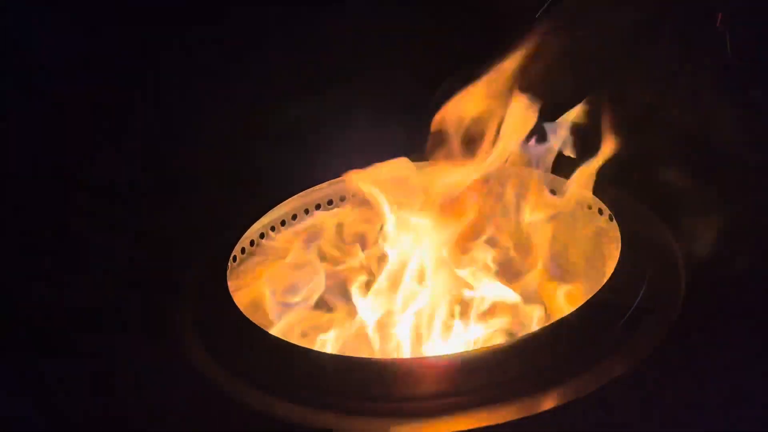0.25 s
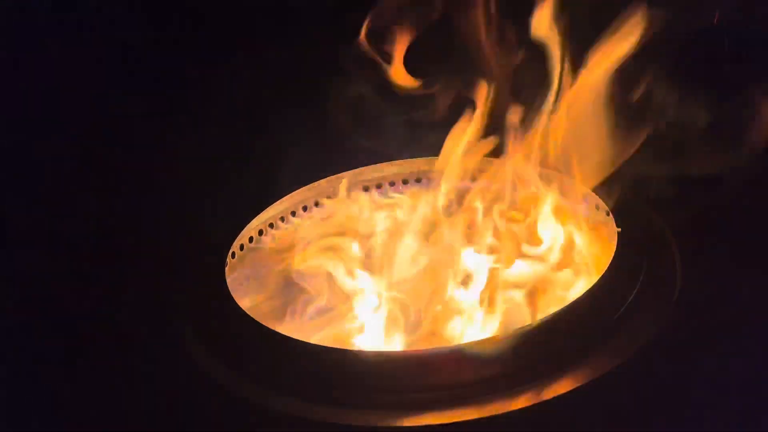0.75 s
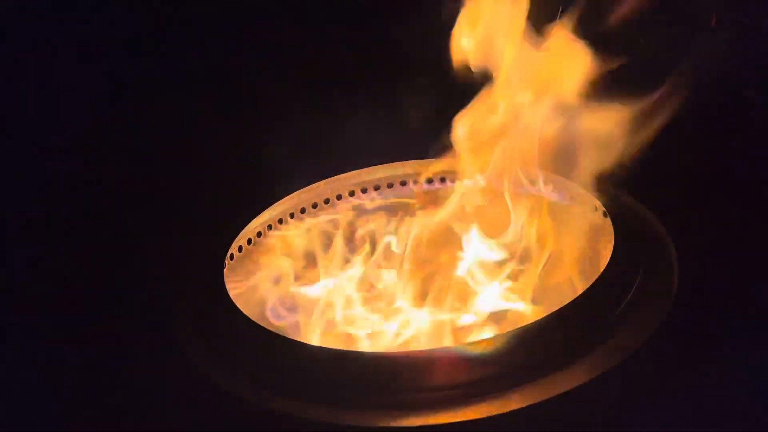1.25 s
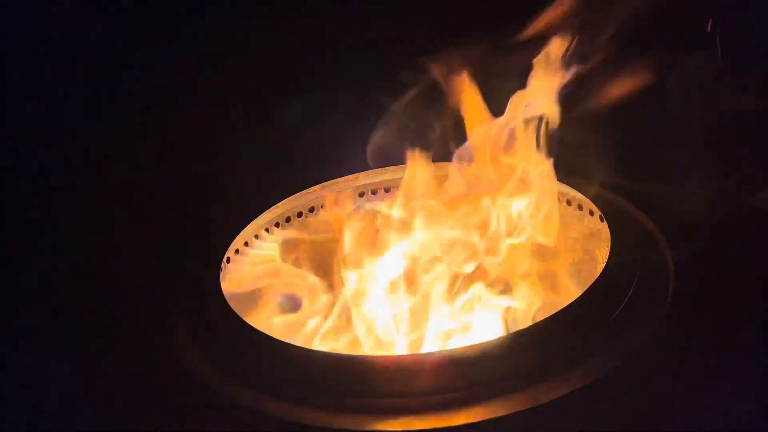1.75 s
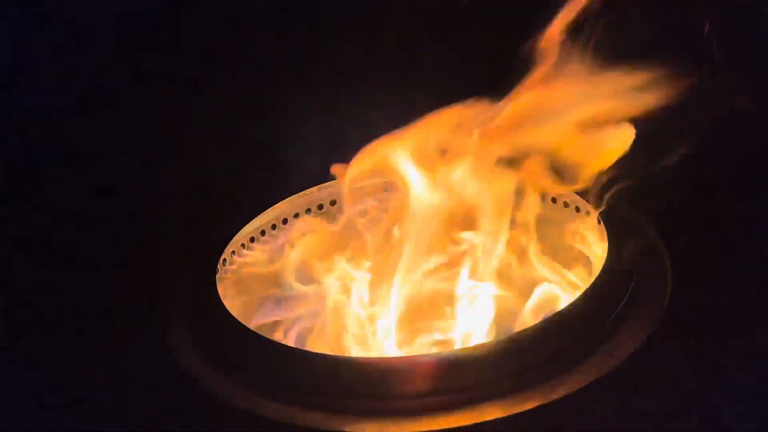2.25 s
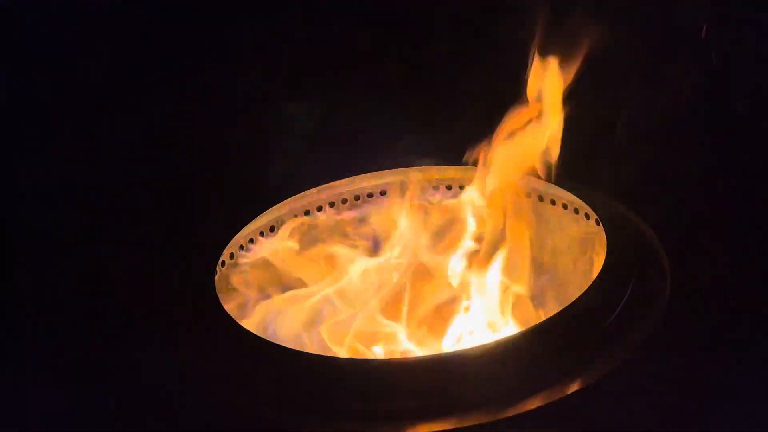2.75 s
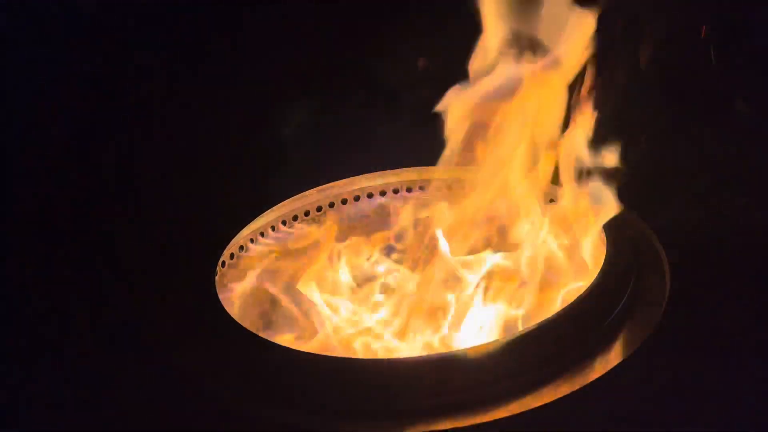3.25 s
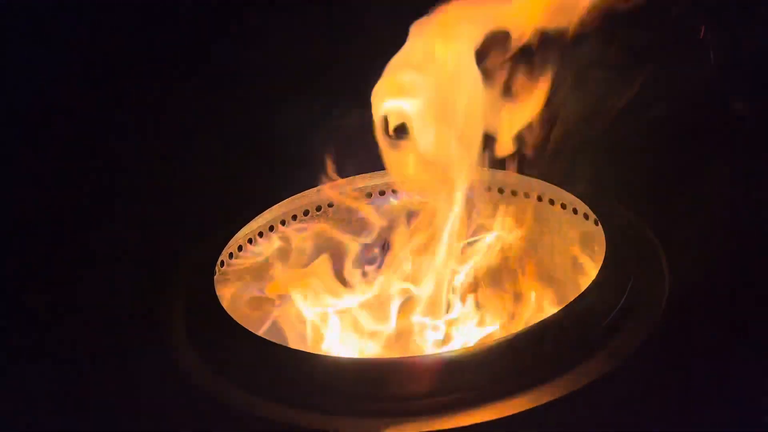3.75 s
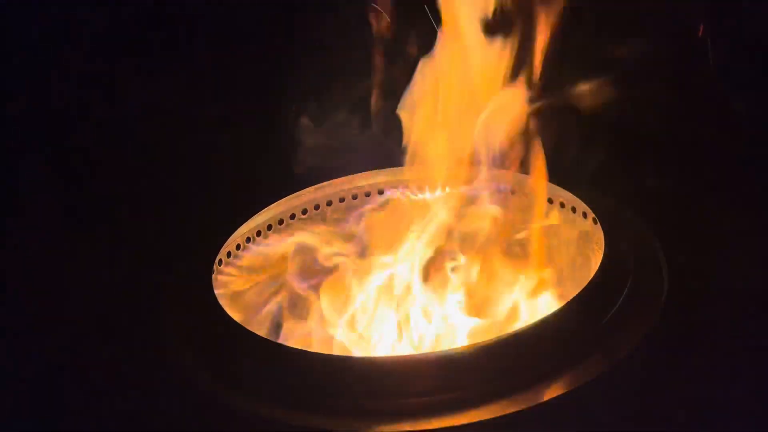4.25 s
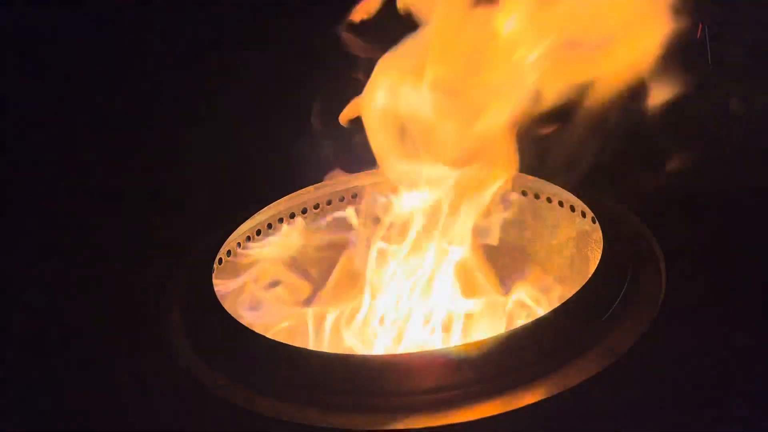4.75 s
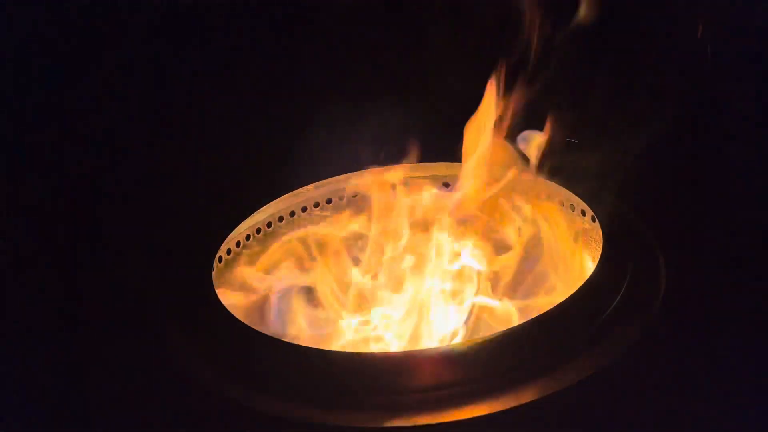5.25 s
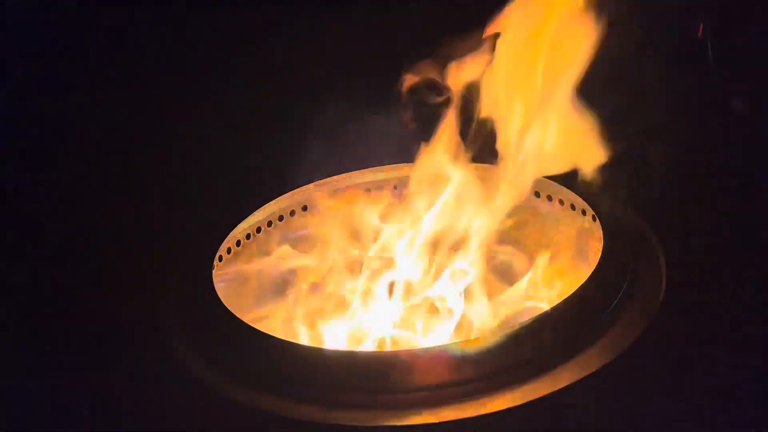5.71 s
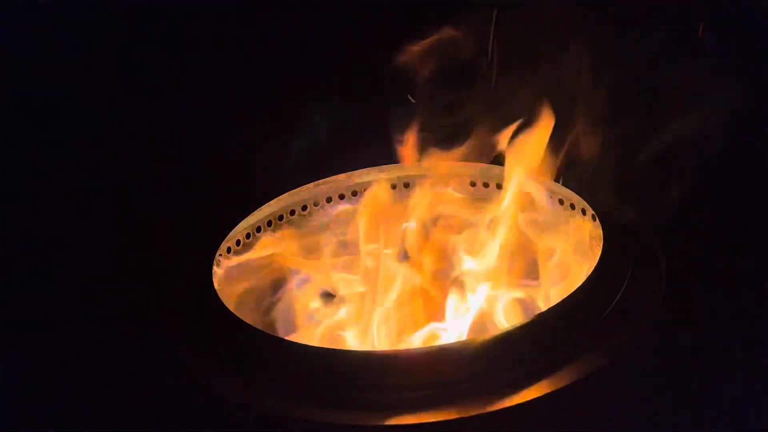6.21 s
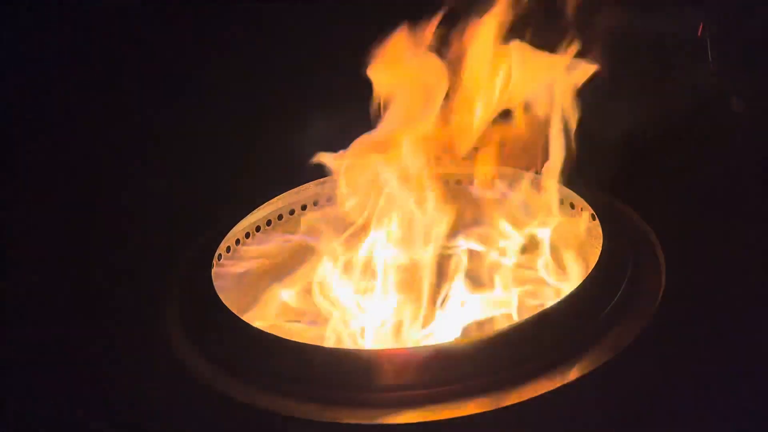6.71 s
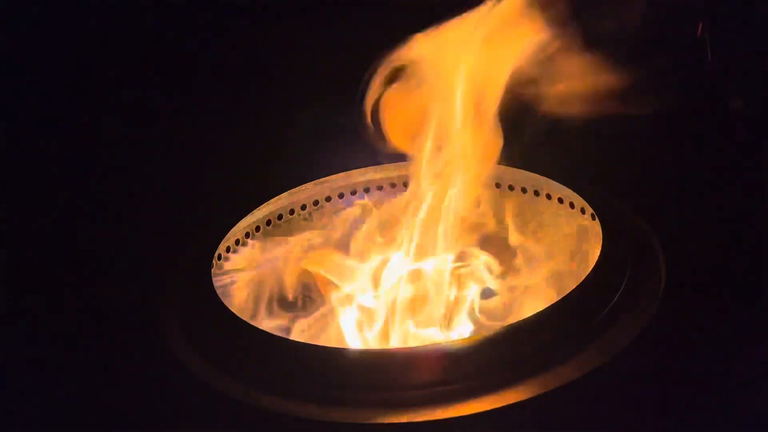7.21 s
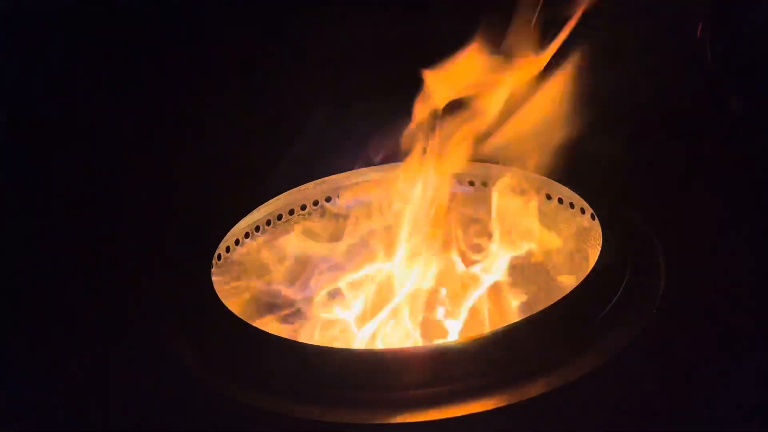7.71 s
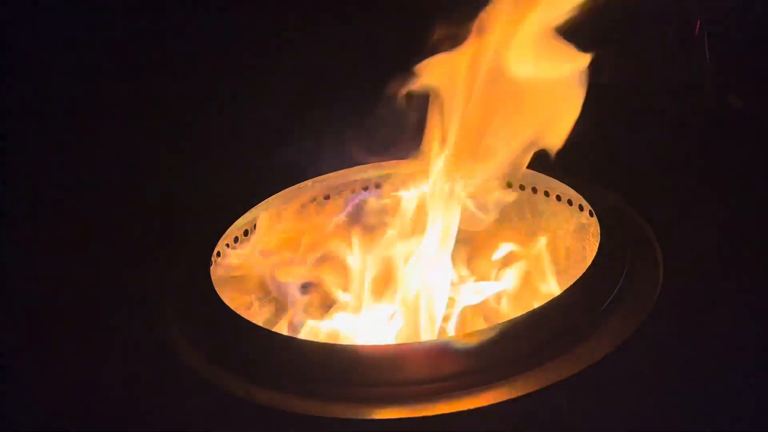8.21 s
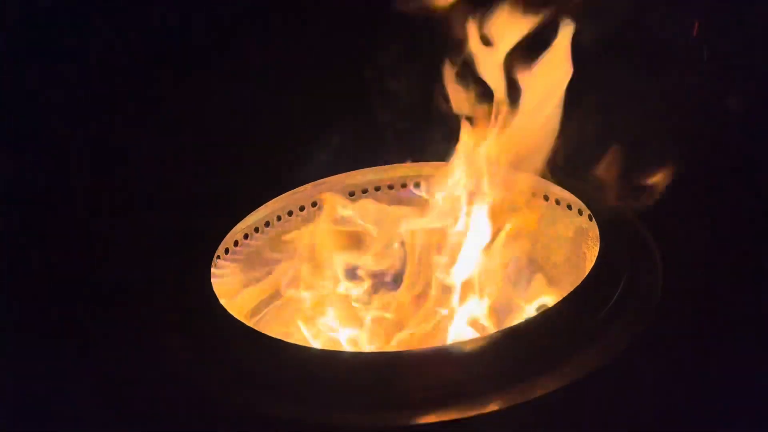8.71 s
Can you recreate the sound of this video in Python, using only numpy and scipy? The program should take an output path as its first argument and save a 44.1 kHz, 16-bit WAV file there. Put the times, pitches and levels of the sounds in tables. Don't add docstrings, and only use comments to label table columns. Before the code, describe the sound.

Outdoors at night, close to a wood fire in a steel pit: a low, lumpy rumble flutters and puffs under an unbroken high cricket trill. Sharp tiny snaps scatter throughout. Early on, logs knock against the metal and scrape for a moment; later only faint bumps. A field cricket chirps now and then over a far insect chorus. Captured in stereo near the fire.

```python
import sys
import numpy as np
from scipy import signal
from scipy.io import wavfile
from scipy.ndimage import uniform_filter1d

SR = 44100
rng = np.random.default_rng(int(sys.argv[2]) if len(sys.argv) > 2 else 0)


def rack_gain(trim_db):
    fader = np.asarray(trim_db, float)
    return 10 ** (fader / 20)


def persist_wave(psi):
    counts = np.round(np.clip(psi, -1, 1) * 32767).astype(np.int16)
    wavfile.write(sys.argv[1], SR, np.atleast_2d(counts).T)


N = 395577

EDGE_HZ = 16300
PIT_LAG = 11.3


def evened(x):
    return x / np.sqrt(np.mean(x ** 2) + 1e-20)


def read(points, hz):
    f, value = np.transpose(points)
    return np.interp(np.log(hz + 1), np.log(f + 1), value)


def add(mix, s, sound):
    part = mix[:, max(round(s * SR), 0):][:, :sound.shape[1]]
    part += sound[:, :part.shape[1]]


def highpass(x, order, hz):
    return signal.sosfilt(signal.butter(order, hz, "high", fs=SR, output="sos"), x)


def drift(top_hz, t):
    coarse = t[::64]
    waves = [np.sin(2 * np.pi * (f * coarse + rng.random())) / np.sqrt(f)
             for f in np.geomspace(top_hz / 20, top_hz, num=16)]
    return np.interp(t, coarse, evened(sum(waves)))


def steadied(x, seconds):
    size = round(seconds * SR)
    power = uniform_filter1d(uniform_filter1d((x ** 2).mean(0), size), size)
    return evened(x / np.sqrt(power + 1e-20))


def turned(x, radians):
    return (signal.hilbert(x) * np.exp(1j * radians)).real


def ports(x, pan_db, lag):
    late = max(round(lag), 0), max(-round(lag), 0)
    return np.array([np.pad(x, (d, 0))[:len(x)] for d in late]) * rack_gain([[pan_db / 2], [-pan_db / 2]])


def noise(shape, same, patchy_db, size, blur):
    hop = size // 2
    hz, t = np.fft.rfftfreq(size, 1 / SR)[:, None], np.arange(N // hop + 5) * hop / SR
    a, b, c, d, patches = rng.standard_normal((len(t), len(hz), 5)).T
    patches = uniform_filter1d(uniform_filter1d(patches, blur[0], 0), blur[1], 1)
    like, left = same(hz), a + 1j * b
    right = like * left + np.sqrt(1 - np.minimum(abs(like), 1) ** 2) * (c + 1j * d)
    z = np.array([left, right]) * shape(hz, t) * rack_gain(patchy_db * evened(patches))
    return signal.istft(z, nperseg=size, noverlap=size - hop)[1][:, :N]


def tilted(curve, left_db):
    return lambda hz, t: rack_gain(read(curve, hz) + np.array([left_db, -left_db])[:, None, None])


def ring(hz, t60, t):
    return rack_gain(-60 * t / t60) * np.sin(2 * np.pi * hz * t)


def strokes(turns, rate, hz, glide, duty, soft=0.57):
    since = ((turns + .5) % 1 - .5) / rate
    swell = np.cos(np.pi * np.clip(since * rate / duty, -.5, .5)) ** soft
    return swell * np.sin(2 * np.pi * (hz * since - glide * since ** 2 / 2))


def night():
    # frequency in Hz, level in dB per Hz
    hum_curve = [(180, -47), (300, -8.5), (487, -11.5), (608, -14.5), (822, -18.5), (1030, -13.5),
                 (1310, -15.5), (1720, -5), (1860, -11.5), (2000, -3), (2600, -33), (4400, -120)]
    hum = noise(tilted(hum_curve, 1.5), lambda hz: 0.058 + 0 * hz, 2.55, size=512, blur=(6, 10))
    return rack_gain(-75) * evened(hum)


def chorus():
    # centre in Hz, width in Hz, level in dB, left-right in dB, left-right likeness (0 to 1)
    insect_bands = [(1886.6, 85, -20, 2.5, 0.2), (2329, 243, -8.5, -10, 0.67), (2818, 380, -13, 0, 0.19),
                    (3394, 620, -20.5, -5, 0.059), (4007, 596, -13, 0, 0.19), (4830, 130, -23.5, 0.5, 0.26),
                    (5220, 56, -19, 12, 0.26), (5295, 930, -25, 6.5, 0.034), (6590, 1820, -29, 3, 0.074),
                    (8050, 1200, -41, -3, 0.2), (12110, 2100, -46, -1, 0.58),
                    (14800, 2700, -45.5, -0.5, 0.92), (9900, 2500, -52.5, -5.5, 0.45)]
    steam_s, steam_rise_s, steam_db = 8.5, .3, 8
    hiss_from_hz = 8700
    centre, width, db, pan_db, like = np.transpose(insect_bands)
    steepness = np.where(centre > 6000, 2.6, 1.47)

    def band(hz):
        return rack_gain(db) / (1 + (2 * (hz - centre) / width) ** 2) ** steepness * (hz < EDGE_HZ)

    def shape(hz, t):
        swell = rack_gain(0.44 * np.array([drift(6, np.repeat(t, 8))[::8] for _ in centre]))
        steam = np.clip((t - steam_s) / steam_rise_s + .4, 0, 1) * (t > steam_s)
        swell[[9, 12]] *= rack_gain(steam_db * steam)
        return np.sqrt([(band(hz) * rack_gain(side * pan_db)) ** 2 @ swell ** 2 for side in (.5, -.5)])

    def same(hz):
        likeness = band(hz) @ like / (band(hz).sum(1) + 1e-12)
        return likeness[:, None] * np.exp(2j * np.pi * hz * PIT_LAG / SR * (hz > hiss_from_hz))

    return rack_gain(-50.5) * evened(noise(shape, same, 1.6, size=1024, blur=(5, 14)))


def neighbours(count, low_hz, high_hz, rate, db, pause, pan_db, lag):
    t, out = np.arange(N) / SR, np.zeros((2, N))
    for a, b, c, d in rng.random((count, 4)):
        pace, hz = rate * (.94 + .12 * a), low_hz + (high_hz - low_hz) * c
        on = np.clip(3 * (drift(2.5, t) - pause), 0, 1)
        song = strokes(pace * t + b + 0.02 * drift(4, t), pace, hz, glide=6100, duty=1.0, soft=1.9)
        out += ports(on * song, pan_db + 6 * (d - .5), lag + 9 * (b - .5))
    return rack_gain(db) * evened(out)


def swarm():
    # time in seconds, level in dB
    swarm_level = [(0.0, -57), (1.42, -54.5), (1.52, -66), (1.87, -54), (2.7, -64), (3.1, -53), (3.52, -66),
                   (3.8, -53), (4.1, -59.5), (7.42, -56.5), (7.55, -67.5), (8.14, -52.5), (8.27, -65),
                   (8.97, -51.5)]
    level = rack_gain(np.interp(np.arange(N) / SR, *np.transpose(swarm_level)) + 58.5)
    return level * neighbours(count=4, low_hz=3952, high_hz=4316, rate=40, db=-60.0, pause=-1.06,
                              pan_db=4.0, lag=11.05)


def ticker():
    # time in seconds, stroke lead in turns, level in dB
    tick_path = [(0.0, -0.04, -81), (1.0, 0.059, -87), (2.004, 0.055, -80), (3.001, -0.041, -80),
                 (3.999, 0.00069, -81), (5.0, -0.21, -93), (6.0, -0.29, -79.5), (6.999, -0.37, -84.5),
                 (7.998, -0.29, -84), (8.97, -0.5, -83)]
    s, lead, db = np.transpose(tick_path)
    t = np.arange(N) / SR
    turns = 3.88 * t + np.interp(t, s, lead)
    pace = np.gradient(turns) * SR
    song = strokes(turns, pace, 5520, glide=280, duty=0.16)
    song += 2.0 * strokes(turns, pace, 5250, glide=130, duty=0.2)
    return ports(song * rack_gain(np.interp(t, s, db) + 14.5 + 4.1 * drift(3, t)), 7.6, 5.1)


def field_cricket():
    # first stroke in seconds, last stroke in seconds, level in dB, left-right in dB
    chirps = [
        (.862, 1.175, -59, -3),
        (3.542, 3.83, -53, 7),
        (5.95, 6.235, -53.5, 6),
        (8.51, 8.67, -59, 8),
        (8.83, 8.92, -65, 8),
        (0.3, 0.38, -67, -1),
    ]
    rate = 38.6
    out = np.zeros((2, N))
    for first, last, db, pan_db in chirps:
        count = round((last - first) * rate) + 1
        t = np.arange(round(count / rate * SR)) / SR
        turns = rate * t - .5 + .0012 * np.sin(90 * t + 40 * first)
        song = strokes(turns, rate, 4400, glide=2500, duty=.8, soft=1.4)
        swell_db = db + 7.5 - 4.6 * np.exp(-t / 0.057)
        add(out, first - .013, ports(song * rack_gain(swell_db), pan_db, 7.5))
    return out


def tree_cricket(rows, rate, hz, glide, pan_db):
    s, lead, db = np.transpose(rows)
    t = np.arange(N) / SR
    turns = rate * t + np.interp(t, s, lead) + 0.0029 * drift(5, t)
    force = rack_gain(np.interp(t, s, db) + 0.7 * drift(12, t))
    song = strokes(turns, rate, hz, glide, duty=0.58, soft=0.93)
    return ports(force * evened(song), pan_db, -21.0)


def tree_crickets():
    # time in seconds, stroke lead in turns, level in dB
    loud_singer = [(0.0, -0.17, -50), (.5, -.17, -49), (1.0, -0.16, -49.5), (1.5, -.14, -48),
                   (2.0, -0.17, -51.5), (2.5, -.17, -49.5), (3.0, -0.16, -49), (3.5, -0.22, -48.5),
                   (4.0, -0.25, -48), (4.55, -0.28, -45.5), (5.0, -0.34, -49.5), (5.5, -.28, -50.5),
                   (6.0, -0.27, -48), (6.5, -0.29, -50), (7.0, -0.3, -48.5), (7.5, -0.37, -48.5),
                   (8.0, -0.33, -48), (8.97, -0.27, -52)]
    # time in seconds, stroke lead in turns, level in dB
    soft_singer = [(0.0, -0.12, -69), (1.0, -0.11, -53), (2.0, -0.094, -54), (3.0, -0.077, -54),
                   (4.5, -0.081, -55), (6.0, -0.077, -52), (7.0, -0.0738, -61), (8.0, -0.078, -55),
                   (8.97, -0.1, -55)]
    return (rack_gain(-4) * tree_cricket(loud_singer, 34.5, 2378, 9700, -5)
            + rack_gain(-2.2) * tree_cricket(soft_singer, 36, 2297, 5000, -1.5))


def garden(x, t60):
    slots = np.arange(200, 12000, 22)
    at = slots + rng.integers(0, 22, (2, len(slots)))
    taps = np.zeros((2, 12100))
    np.put_along_axis(taps, at, rng.choice([-1., 1.], at.shape) * rack_gain(-60 * at / SR / t60), 1)
    return signal.oaconvolve(x, taps / np.linalg.norm(taps[0]), axes=1)[:, :N]


def thinned(insects):
    # centre in Hz, sharpness (Q)
    gaps = [
        (4490, 19),
        (4590, 19),
    ]
    refill_hz, empty = 9, .55
    share = np.clip(1 - .6 * (drift(refill_hz, np.arange(N) / SR) - empty), .3, .97)
    for hz, sharpness in gaps:
        insects = insects - share * signal.lfilter(*signal.iirpeak(hz, sharpness, SR), insects)
    return insects


def snap(pocket_hz, grit):
    spit_hz = np.array(np.array([4700, 8300, 10200, 12300, 15300]))
    colour_db = np.array(np.array([12.0, 0.0, -4, -3.0, 3.0]))
    t = np.arange(len(grit)) / SR
    spit = grit * (rack_gain(-60 * t / 0.0048) + rack_gain(-22.5 - 60 * t / 0.12))
    shares_db = -19.5 * abs(np.log2(spit_hz / pocket_hz)) + colour_db
    shares_db = shares_db - shares_db.max()
    wide = np.diff(spit, 2, prepend=[0, 0])
    sound = rack_gain(-3.5) * wide / abs(np.diff(spit, 2)).max()
    for k, (hz, share_db) in enumerate(zip(spit_hz, shares_db)):
        band = (-1) ** k * signal.fftconvolve(spit, ring(hz, 0.0011, t[:200]))[:len(t)]
        sound = sound + rack_gain(share_db) * band / abs(band).max()
    return sound


def crackles():
    # time in seconds, peak in dB, pocket pitch in Hz
    snaps = [(0.5518, -54, 12400), (1.514, -53.5, 14900), (1.62, -55, 8240), (2.533, -52, 11500),
             (2.869, -58, 7950), (3.371, -53.5, 4870), (3.3687, -64, 8000), (3.803, -56.5, 14700),
             (3.898, -62.5, 12850), (4.273, -61, 13200), (4.701, -59.5, 10200), (4.792, -54, 9900),
             (5.353, -59.5, 13500), (5.5004, -61.5, 8200), (5.6117, -60, 12500), (5.7733, -49, 12200),
             (5.8242, -56.5, 9500), (6.096, -64, 8000), (6.359, -60, 8300), (6.6025, -55, 8100),
             (6.7695, -55, 13940), (6.879, -57.5, 10200), (7.1353, -65, 13200), (7.239, -64, 8700),
             (7.455, -56.5, 10300), (7.5053, -64, 8160), (7.517, -59, 8900), (8.413, -67.5, 12100),
             (8.642, -65, 10000), (2.5358, -62, 12300), (5.7735, -58, 8300), (6.7763, -56.5, 14700),
             (.2239, -61, 14000), (0.297, -63, 7800), (.37, -74, 15300), (0.677, -64.5, 8300),
                   (1.3633, -64, 9000), (1.686, -64.5, 13000), (2.0862, -61, 8000), (2.37, -64.5, 8600),
                   (2.803, -71, 10500), (2.9594, -67, 11000), (3.3923, -67, 9900), (3.645, -67, 8200),
                   (3.886, -69, 12800), (4.849, -61, 9100), (5.652, -63, 9400), (5.9494, -62, 8600),
                   (6.067, -84, 15300), (6.6478, -81, 9050), (6.6664, -63.5, 12000), (7.0976, -64, 8450),
                   (7.3006, -69, 8000), (7.839, -63.5, 9500), (7.9408, -72, 10000), (7.969, -65.5, 8000),
                   (8.085, -62, 15300), (0.1925, -72, 12100), (0.8205, -74, 8240), (1.249, -69, 8300),
                   (3.162, -71, 8100), (5.568, -69, 8200), (5.687, -70, 9000), (6.11, -65, 8000),
                   (6.728, -70, 8000), (7.355, -71, 12500), (7.403, -72, 12000), (7.53, -67, 8300),
                   (7.62, -72, 15100), (8.523, -65, 8000), (8.7695, -66, 13400), (8.785, -69, 13500)]
    out, rows = np.zeros((2, N)), snaps
    for (s, db, hz), grit in zip(rows, rng.standard_normal((len(rows), 1500))):
        sound = rack_gain(db + 13.0) * snap(hz, grit)
        add(out, s, ports(sound, .3 + 2.7 * grit[-2], PIT_LAG + 0.66 * grit[-1]))
    bursts = rng.random(N) < 40 / SR
    size = rack_gain(7.4 * np.minimum(rng.exponential(1, N), 4)) * bursts
    fizz = signal.oaconvolve(size, snap(8900, rng.standard_normal(1500)))[:N]
    out += ports(rack_gain(-86.5) * fizz, .3, 9.1)
    return highpass(out, 2, 3200)


def knocks():
    # time in seconds, peak in dB, bowl thump in dB, brightness in dB, wall pitch as a ratio
    log_knocks = [(0.5575, -34, -11, -3, 0.99), (0.903, -41.5, -11, -13, 0.86), (1.338, -32, -9, -9, 0.96),
                  (2.249, -62, 3, -13, 1), (4.157, -51, -25, -4, 0.89), (4.19, -67.5, 17, -2, 1),
                  (4.432, -62, 6, -1, 0.78), (5.8245, -48, 17, -21, 1.42), (6.376, -64.5, 14, -7, 0.59),
                  (6.962, -64.5, 16, -17, 1.2), (8.333, -53, -13, -26, 0.93)]
    # time in seconds, peak in dB
    scrapes = [(1.395, -51.5), (1.411, -57), (1.441, -50), (1.489, -60), (1.513, -58.5), (1.554, -64),
               (1.578, -58.5), (1.694, -56), (1.749, -54), (1.763, -59), (1.793, -55.5), (1.813, -57),
               (1.835, -61), (1.862, -60.5)]
    # time in seconds, peak in dB
    embers = [(1.1, -80), (2.594, -73.5), (3.127, -70), (3.635, -74), (4.911, -74), (5.192, -66.5),
              (5.279, -69), (5.469, -72), (6.865, -67), (8.221, -68.5), (4.957, -83), (5.222, -69),
              (5.44, -72), (5.646, -69), (5.683, -74), (5.707, -66), (5.782, -70)]
    # frequency in Hz, level in dB, t60 in seconds
    steel = [
        (603, 4.5, 0.021),
        (774, 1, 0.012),
        (1020, -9.5, 0.033),
    ]
    lead_in = 200
    rub_t60, rim_t60 = 0.042, 0.07
    wall_turn = 1.53
    out, t = np.zeros((2, N)), np.arange(5000) / SR
    rows = log_knocks + [(*r, -5, 2.5, 1.01) for r in scrapes] + [(*r, 13.5, -9, 0.734) for r in embers]
    for (s, db, thump_db, bright_db, tone), grit in zip(rows, rng.standard_normal((len(rows), 5000))):
        rub_db = np.clip(-46.0 - 1.22 * db, -23, -2)
        blow = grit * rack_gain(rub_db - 55 * t / rub_t60)
        blow[:20] += 1.4 * np.hanning(20)
        pitch = tone * (1 + 0.048 * grit[-1])
        wall = sum(rack_gain(d) * ring(f * pitch, t60, t) for f, d, t60 in steel)
        wall = highpass(signal.fftconvolve(blow, wall)[:len(t)], 4, 440)
        rim = ring(1650, 0.027, t) + .5 * ring(1600, 0.0069, t)
        rim = signal.fftconvolve(grit * rack_gain(-60 * t / rim_t60), rim)[:len(t)]
        sound = wall / abs(wall).max() + rack_gain(bright_db - 4.5) * rim / abs(rim).max()
        bowl = rack_gain(np.minimum(thump_db, 18) - 2.5) * ring(246, 0.019, t)
        bowl = bowl * 14 * (1 - np.exp(-t / 0.0054)) ** 3
        left, right = ports(np.pad(sound, (lead_in, 0)), 7.5, 3)
        both = np.array([left, turned(right, wall_turn)]) + np.pad(bowl, (lead_in, 0))
        add(out, s - lead_in / SR, rack_gain(db + 2.0) * both)
    return out


def flames():
    # time in seconds, level in dB
    burn_curve = [(0, -57), (.6, -58.5), (1.3, -55), (1.85, -60.5), (2.1, -61), (2.6, -53.5), (3.0, -58.5),
                  (3.3, -62.5), (3.6, -58), (4.6, -57), (5.3, -58), (5.75, -53.5), (6.1, -58), (6.7, -58.5),
                  (7.4, -58), (8.3, -57), (8.65, -53), (8.97, -58)]
    # start in seconds, length in seconds, depth in dB
    lulls = [(0.42, 0.13, -4), (1.9, 0.045, -5), (2.654, 0.12, -15.5), (3.29, 0.16, -1.5),
             (3.675, 0.088, -6.5), (4.664, 0.055, -4), (5.854, 0.1, -4.5), (6.18, 0.066, -5),
             (6.72, 0.081, -2), (6.996, 0.045, 3), (7.672, 0.036, -7), (8.455, 0.12, -8)]
    # time in seconds, rise of the flutter in dB, length in seconds
    puffs = [(0.57, 16.5, 0.21), (0.913, 9.5, 0.21), (2.044, 13.5, 0.084), (2.41, 13.5, 0.039),
             (3.141, 11, 0.087), (3.473, 13, 0.044), (3.633, 14, 0.21), (3.823, 10.5, 0.037),
             (4.029, 15, 0.035), (4.466, 1, 0.038), (5.04, 7.5, 0.059), (5.206, 10, 0.028),
             (5.497, 14.5, 0.018), (5.644, 1, 0.014), (6.052, 11.5, 0.082), (6.276, 6.5, 0.19),
             (6.518, 11.5, 0.036), (6.876, 13.5, 0.052), (6.957, 16, 0.042), (7.205, 6, 0.19),
             (7.496, 5, 0.096), (7.73, 7.5, 0.095), (7.98, 14, 0.073), (8.212, 13, 0.056),
             (8.403, 3, 0.066)]
    # frequency in Hz, level in dB per Hz
    roar_curve = [(12, -65), (24, -30), (48, -1), (86, -1.5), (168, -5.5), (238, -6), (425, -37),
                  (500, -38), (650, -35), (1100, -120)]
    # frequency in Hz, left-right likeness (0 to 1)
    roar_same = [(60, 0.957), (200, 0.93), (330, 0.89), (500, 0.65)]
    calm_db, lull_edge_s = -54, 0.011
    puff_rise = 0.87
    coarse, t = np.arange(0, N + 64, 64) / SR, np.arange(N) / SR
    burn_db = np.interp(coarse, *np.transpose(burn_curve)) - calm_db
    for s, length, db in lulls:
        fall = np.tanh((coarse - s) / lull_edge_s)
        burn_db += db / 2 * (fall - np.tanh((coarse - s - length) / lull_edge_s))
    puff_db = np.zeros(len(coarse))
    for s, db, length in puffs:
        side = np.where(coarse < s, puff_rise, 1)
        puff_db += db * np.exp(-(2 * (coarse - s) / length / side) ** 2)
    burn_db, puff_db = np.interp(t, coarse, burn_db), np.interp(t, coarse, puff_db)

    raw = noise(tilted(roar_curve, .6), lambda hz: read(roar_same, hz), 2.1, size=2048, blur=(8, 2))
    raw = raw * rack_gain(3.96 * drift(30, t))
    low = signal.sosfiltfilt(signal.butter(3, 120, fs=SR, output="sos"), raw)
    high = (raw - low) * rack_gain(0.86 * drift(13.0, t))
    roar = rack_gain(burn_db + 0.32 * puff_db - 1.3) * steadied(low, 0.083)
    flutter = rack_gain(-5.5 + 1.94 * burn_db + puff_db) * steadied(high, 0.14)
    return rack_gain(calm_db) * (roar + flutter)


def scene():
    near = tree_crickets() + ticker() + swarm()
    near += neighbours(count=2, low_hz=2140, high_hz=2368, rate=36, db=-64.5, pause=-1.2,
                       pan_db=-7.0, lag=-24.0)
    fire = knocks() + crackles()
    echo = garden(rack_gain(-13.0) * near + rack_gain(-26.0) * fire, 0.35)
    insects = thinned(near + echo + night() + chorus())
    return insects + rack_gain(-5) * field_cricket() + fire + flames()


def band_limit(x):
    return signal.sosfilt(signal.butter(12, 15840, fs=SR, output="sos"), x)


def record(dry):
    x = highpass(dry, 4, 38)
    top = signal.firwin(401, EDGE_HZ, window=("kaiser", 8), fs=SR)
    x = signal.oaconvolve(x, top[None], "same")
    return band_limit(x)


dry = scene()
out = record(dry)
persist_wave(out)
```